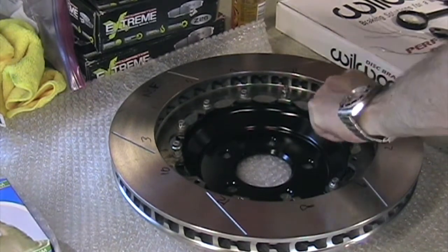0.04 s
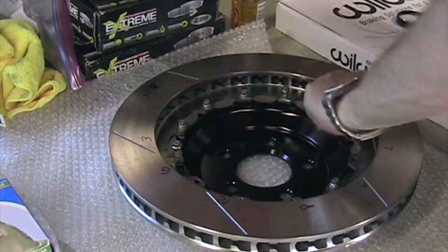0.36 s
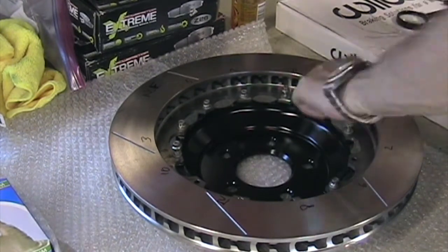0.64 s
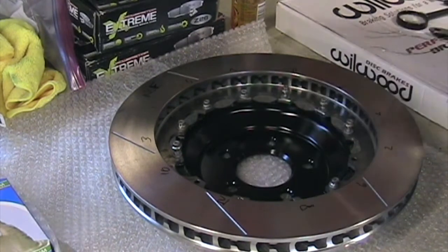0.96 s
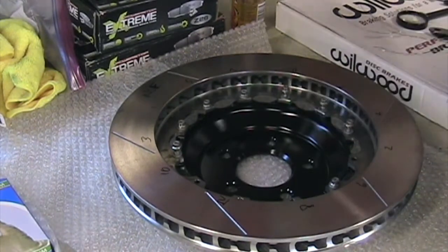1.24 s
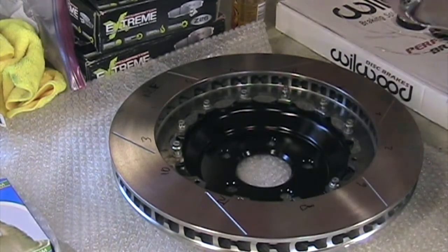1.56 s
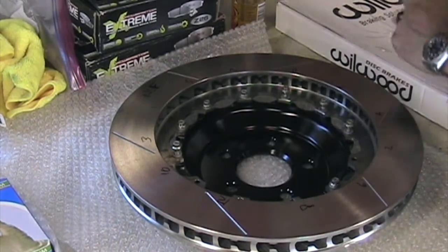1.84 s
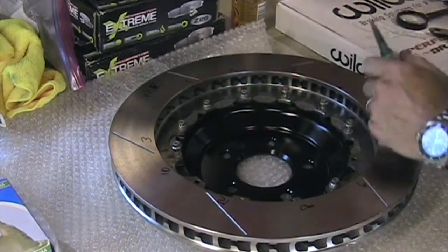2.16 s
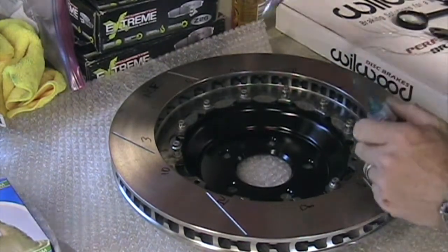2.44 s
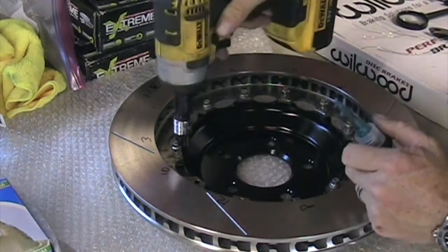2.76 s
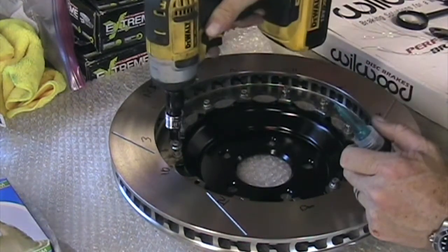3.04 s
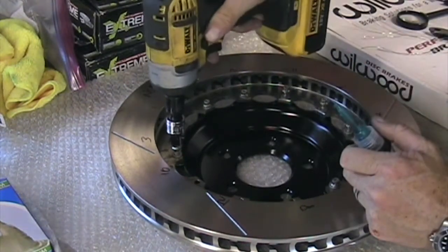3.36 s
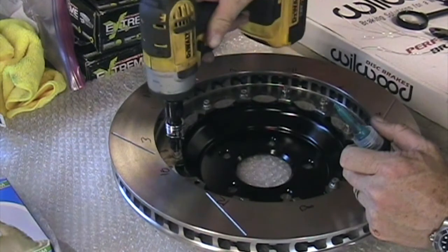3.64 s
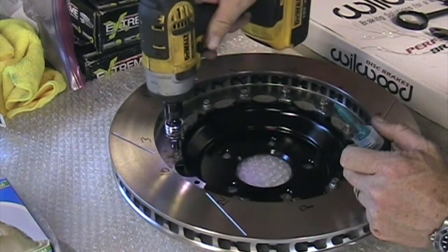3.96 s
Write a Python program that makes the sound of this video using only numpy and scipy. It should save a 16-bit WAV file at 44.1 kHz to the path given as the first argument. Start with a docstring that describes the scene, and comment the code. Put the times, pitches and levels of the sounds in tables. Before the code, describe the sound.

A cordless driver's socket knocks and rattles on a bolt, making a steel brake rotor ring briefly. Before it come faint hum and a small tool scrape; after it, a dull thump. Close by, in a small workshop.

```python
"""A steel brake rotor lies on bubble wrap on a workshop bench, under a faint hum. Fingers twist a bolt
in its hole, and stick-slip friction rings the rotor faintly. A hand tool scrapes off the bench.
The socket of a cordless driver then knocks and rattles on the bolt, each impact exciting the rotor's
damped modes, until it seats with a crunch. A dull thump rings through the bench, and last the motor
just begins to whine."""
import sys
import numpy as np
from scipy import signal
from scipy.fft import rfft, irfft
from scipy.io import wavfile

SR = 44100
rng = np.random.default_rng(int(sys.argv[2]) if len(sys.argv) > 2 else 0)


def transcribe(u):
    """Save the signal u as a 16-bit wav file named by the first command-line argument.

    u: samples, shape (n,) or (channels, n), limited to [-1, 1]; the rate is SR.
    q: integer samples, one column per channel.
    """
    v = np.clip(np.atleast_2d(u).T, -1, 1)
    q = np.round(v * 32767).astype(np.int16)
    wavfile.write(sys.argv[1], SR, q)


N = 176400
T = np.arange(N) / SR

# socket striking bolt: t/s, rotor ring level/dB, clack level/dB, click level/dB, contact time/s
IMPACTS = [(2.9008, -13.5, -4, -20.5, 0.00092), (2.913, -43, -27, -27, .0005),
           (2.9275, -30, -19.5, -27, 0.00095), (2.961, -25, -27, -31, 0.00062),
           (3.1602, -13, -14, -21, 0.00065), (3.1665, -22.5, -17, -28, 0.00052),
           (3.1737, -22, -28, -26, 0.00051), (3.2160, -28, -34, -52, 0.002),
           (3.2450, -28.5, -30, -52, 0.0035), (3.2660, -17, -13, -28.5, 0.0011),
           (3.4073, -46, -35, -36, 0.0011), (3.4295, -22, -19, -30, 0.0023),
           (3.5725, -34, -36.5, -62, 0.00067), (3.665, -23.5, -21, -21.5, 0.002),
           (3.6830, -19, -10, -20, 0.003), (3.6977, -21, -14.5, -20, 0.0025)]
# rotor modes, damped by the wrap: f/Hz, level/dB, T60/s
ROTOR_MODES = [(963.5, -12, .15), (1171, -5, .13), (1307, -2, 0.12), (1355, -5.5, 0.16), (1880, -16, 0.13),
               (2094, -12.5, .08), (2590, -17, .085), (2890, -23, .11), (3510, -22.5, 0.062),
               (5850, -31, .08)]
# crowded, quickly damped modes of driver and socket: f/Hz, level/dB
CLACK_SPECTRUM = [(400, -38.5), (700, -28), (950, -8), (1270, 6.5), (1600, -13), (2100, -9.5), (4200, -32),
                  (9000, -57)]
# steel touching steel: f/Hz, level/dB
CLICK_SPECTRUM = [(1500, -15), (3500, -7), (6200, -0.5), (9000, -1), (14000, -11)]
# the loose socket chattering after an impact: f/Hz, level/dB
CHATTER_SPECTRUM = [(1100, -24), (2100, 2), (4300, -12.5), (6300, -6), (12000, -19)]
def socket(pressed_s=3.38, skid_s=0.0026):
    """Impact excitation: each blow rings rotor and driver; a longer, skidding contact chatters more."""
    out = np.zeros(N)
    for s, ring_db, clack_db, click_db, contact in IMPACTS:
        decay = 0.73 if s > pressed_s else 1  # bearing on the bolt, the socket damps the rotor
        add(out, s + contact / 2, from_db(ring_db) * ring(ROTOR_MODES, decay))
        add(out, s, from_db(clack_db) * burst(CLACK_SPECTRUM, 2 * contact, t60=0.037))
        add(out, s, from_db(click_db) * burst(CLICK_SPECTRUM, contact / 2, t60=0.014))
        chatter_gain = from_db(clack_db - 18.5) * np.sqrt(contact / skid_s)
        add(out, s, chatter_gain * burst(CHATTER_SPECTRUM, 2 * contact, t60=0.077))
    return out


# tool ticks and the socket's seating crunch: t/s, level/dB, centre f/Hz, half-width/octaves
TRANSIENTS = [(1.860, -38, 5800, .8), (2.219, -44.5, 4430, 1.1), (2.408, -37, 5000, .75),
              (3.519, -36, 6900, 0.23), (3.609, -36.5, 4470, 1.1), (3.6864, -15, 2230, 0.6),
              (3.933, -39, 4400, 1.4)]
def ticks_and_crunch():
    """Band-limited transients: short ticks of tools, and the loud crunch of the socket skidding home."""
    out, hz = np.zeros(N), np.geomspace(200, 15000, 40)
    for s, db, centre_hz, width in TRANSIENTS:
        band_db = -6 * np.log2(1 + (np.log2(hz / centre_hz) / width) ** 4)
        add(out, s, from_db(db) * burst(np.c_[hz, band_db], rise=0.00035, t60=0.026))
    return out


# hands and tools bumping the bench: t/s, level/dB, corner f/Hz
SOFT_BUMPS = [(1.571, -44.5, 220), (1.630, -43.5, 177), (2.756, -42.5, 314), (3.430, -36, 570),
              (3.474, -42.5, 383), (3.683, -33.5, 180)]
# rumble of the thump: f/Hz, level/dB
THUMP_SPECTRUM = [(30, -12), (100, -1), (1100, -2), (2200, -29), (9000, -41)]
# bench modes: f/Hz, level/dB, T60/s
BENCH_MODES = [(102.8, -39.5, 0.43), (524.5, -33, 0.37), (1040, -17.5, 0.05)]
def bench(thump_s=3.749, rise_s=0.0027):
    """Soft impacts excite mainly low frequencies; one heavier thump rumbles on and rings the bench."""
    out = np.zeros(N)
    for s, db, hz in SOFT_BUMPS:
        spectrum = [(hz / 8, -12), (hz / 2, 0), (hz, 0), (2 * hz, -18), (20 * hz, -55)]
        add(out, s, from_db(db) * burst(spectrum, rise_s, t60=0.074))
    onset = np.minimum(T[:SR] / rise_s, 1)
    add(out, thump_s, from_db(-27) * onset * tail(THUMP_SPECTRUM, bass_t60=0.67, damping_hz=1100))
    add(out, thump_s, onset[:SR // 4] * ring(BENCH_MODES))
    return out


# fingers turning the bolt: t/s, duration/s, level/dB
BOLT_TURNS = [(0.056, 0.018, -59.5), (0.244, 0.073, -53), (0.459, 0.055, -47.5), (.612, 0.034, -58)]
# friction in the thread: f/Hz, level/dB
THREAD_SPECTRUM = [(700, -16), (1150, 3), (1900, 3), (4000, -14), (9000, -14)]
def bolt(edge_s=0.012, ring_db=-13):
    """Stick-slip friction: the thread moves in tiny slips that drive the rotor's modes faintly."""
    envelope = sum(from_db(db) * np.clip(np.minimum(T - s, s + length - T) / edge_s + .5, 0, 1)
                   for s, length, db in BOLT_TURNS)
    slips = envelope * noise(THREAD_SPECTRUM, grainy=True)
    return slips + from_db(ring_db) * response(slips, ring(ROTOR_MODES))


# envelope of the scrape: t/s, level/dB
SCRAPE_ENVELOPE = [(1.72, -72), (1.785, -44.5), (1.815, -39.5), (1.865, -40.5), (1.882, -49.5), (1.98, -70)]
# tool sliding on the bench: f/Hz, level/dB
SCRAPE_SPECTRUM = [(100, -18), (400, 0.5), (1300, -1.5), (2600, -15), (13000, -17.5)]
# resonance of the scrape: t/s, f/Hz
SCRAPE_PITCH = [(1.78, 520), (1.84, 1398)]
def dragged_tool(width_hz=250, lift_s=1.8665):
    """Sliding friction: a grainy scrape with a rising resonance, then a knock as the tool lifts off."""
    phase = 2 * np.pi * np.cumsum(np.interp(T, *np.transpose(SCRAPE_PITCH))) / SR
    resonance = flicker(width_hz) * np.sin(phase) + flicker(width_hz) * np.cos(phase)
    envelope = from_db(np.interp(T, *np.transpose(SCRAPE_ENVELOPE), left=-np.inf))
    out = envelope * (noise(SCRAPE_SPECTRUM, grainy=True) + from_db(-5.5) * resonance)
    add(out, lift_s, ring([(763, -28, 0.084)]))  # one hollow mode
    return out


def motor(trigger_s=3.985, gears_s=3.9895, switch_hz=3905):
    """Switching in the speed control gives two harmonics; a moment later the gears begin to grind."""
    phase = 2 * np.pi * switch_hz * T
    whine = from_db(-37) * np.sin(phase) + from_db(-33.5) * np.sin(2 * phase)
    gears = from_db(-40) * (noise(CLACK_SPECTRUM) + noise(CHATTER_SPECTRUM))
    return whine * (T > trigger_s) + gears * (T > gears_s)


# envelope of the rustle: t/s, level/dB
GRIP_ENVELOPE = [(2.3, -67.5), (2.79, -56), (2.87, -63), (3.2, -78), (3.6, -50), (4.0, -50.5)]
# hand rubbing on the tools: f/Hz, level/dB
GRIP_SPECTRUM = [(40, -3.5), (1200, -7), (12000, -39.5)]
def grip(roughness_db=3):
    """Friction noise: the grip on the tools rustles with random amplitude modulation."""
    envelope = from_db(np.interp(T, *np.transpose(GRIP_ENVELOPE)))
    return envelope * rms_one(noise(GRIP_SPECTRUM) * from_db(roughness_db * flicker(60)))


# diffuse reflections: f/Hz, level/dB
ECHO_SPECTRUM = [(100, 7), (1200, -5.5), (3000, 0), (7000, -1), (13000, -6)]
def workshop_echo(sound, delay_s=0.00557):
    """Reverberation: the reflections of a small room merge into a short diffuse tail."""
    reflections = tail(ECHO_SPECTRUM, bass_t60=0.36, damping_hz=21900) * (T[:SR] > delay_s)
    return from_db(-12.5) * response(sound, reflections)


# steady hum: f/Hz, rms level/dB
HUM_TONES = [(1072, -70), (1169, -66), (1335, -73), (3122, -74), (3499, -76), (4075, -74.5), (4495, -76),
             (5351, -78)]
# room air: f/Hz, level/dB
AIR_SPECTRUM = [(18, -19), (30, -3), (600, -4.5), (1200, -9), (2500, -12.5), (5500, -20), (9000, -19.5)]
def hum_and_air(waver_rad=0.45):
    """Phase modulation makes thin hum tones waver together, over the broadband noise of room air."""
    waver = waver_rad * flicker(30)
    hum = sum(from_db(db) * np.sqrt(2) * np.sin(2 * np.pi * hz * T + waver) for hz, db in HUM_TONES)
    return from_db(-57) * noise(AIR_SPECTRUM) + hum


# spectral envelope of the thin whistles: f/Hz, level/dB
WHISTLE_SPECTRUM = [(1800, -30), (4600, 2), (5800, -9), (8500, -8), (8950, 9), (9600, -7)]
def whistles(mean_spacing_hz=40):
    """A line spectrum: a crowd of faint steady tones at random frequencies."""
    lines = rfft(noise(WHISTLE_SPECTRUM))
    sounding = rng.random(len(lines)) < SR / N / mean_spacing_hz
    return from_db(-68.5) * rms_one(irfft(lines * sounding, N))


def ring(modes, decay=1, scatter_db=2.5, detune=0.007):
    """Modal superposition: damped sinusoids whose strength and tuning vary from blow to blow."""
    t, out = T[:SR // 4], 0
    for k, (hz, db, t60) in enumerate(modes):
        amplitude = (-1) ** k * from_db(db + scatter_db * rng.standard_normal())
        detuned_hz = hz * (1 + detune * rng.uniform(-1.02, 1))
        out += amplitude * fall(t, t60 * decay) * np.sin(2 * np.pi * detuned_hz * t)
    return out


def burst(spectrum, rise, t60):
    """Modal overlap: close modes struck together act as noise that rises and decays, of set energy."""
    t = T[:SR // 4]
    envelope = np.minimum(t / rise, 1) * fall(np.maximum(t - rise, 0), t60)
    return rms_one(noise(spectrum, size=len(t)) * envelope) * np.sqrt(np.mean(envelope ** 2))


def tail(spectrum, bass_t60, damping_hz):
    """Frequency-dependent damping: octave bands of noise die away, twice as fast at damping_hz."""
    source = rfft(noise(spectrum, size=SR))
    octave = np.log2(np.maximum(np.fft.rfftfreq(SR, 1 / SR), 1))
    return sum(irfft(source * np.maximum(1 - abs(octave - k), 0), SR)
               * fall(T[:SR], bass_t60 / (1 + 2 ** k / damping_hz)) for k in range(4, 15))


def noise(spectrum, size=N, grainy=False, grains_per_s=2500):
    """Spectral shaping: coloured noise of rms 1, made of separate tiny slips if grainy."""
    hz, db = np.transpose(spectrum)
    f = np.maximum(np.fft.rfftfreq(size, 1 / SR), 1)
    source = rng.standard_normal(size) * (rng.random(size) < grains_per_s / SR if grainy else 1)
    gain = from_db(np.interp(np.log(f), np.log(hz), db))
    return rms_one(irfft(rfft(source) * gain, size))


def response(force, impulse):
    """Convolution with an impulse response scaled to unit energy."""
    return signal.fftconvolve(force, impulse / np.sqrt(np.sum(impulse ** 2)))[:N]


def flicker(rate):
    """Random modulation of rms 1, with rate new values a second."""
    return rms_one(np.interp(T * rate, np.arange(4096), rng.standard_normal(4096)))


def fall(t, t60):
    """Exponential decay, 60 dB in t60."""
    return np.exp(-np.log(1000) * t / t60)


def from_db(db):
    """Level to amplitude ratio."""
    return 10 ** (np.asarray(db) / 20)


def rms_one(x):
    """Normalisation to rms 1."""
    return x / np.sqrt(np.mean(x ** 2) + 1e-20)


def add(out, s, sound):
    """Superposition of a sound starting at time s."""
    i = int(np.clip(s * SR, 0, N - 1))
    out[i:i + len(sound)] += sound[:N - i]


def scene():
    """Linear superposition of the work at the bench, its echo and the background."""
    work = socket() + ticks_and_crunch() + bench() + bolt() + grip() + dragged_tool() + motor()
    return (work + workshop_echo(work) + hum_and_air() + whistles())[None]


def record(dry, ceiling=0.88, rolloff_hz=10100, stopband_hz=15200):
    """Soft saturation rounds the peaks; low-pass filters dull the treble and cut off the top."""
    rounded = dry / (1 + (dry / ceiling) ** 6) ** (1 / 6)
    dulled = signal.sosfilt(signal.butter(5, rolloff_hz, fs=SR, output="sos"), rounded)
    return signal.sosfilt(signal.cheby2(12, 60, stopband_hz, fs=SR, output="sos"), dulled)


dry = scene()
out = record(dry)
transcribe(out)
```